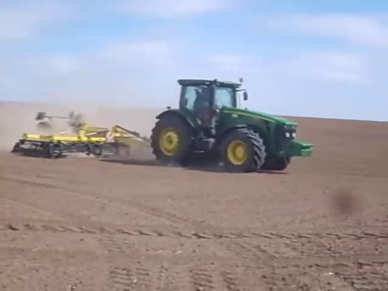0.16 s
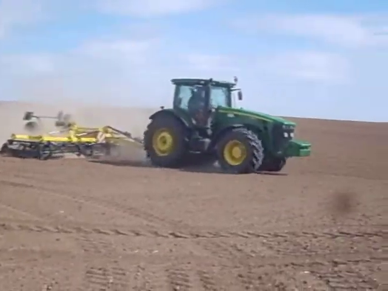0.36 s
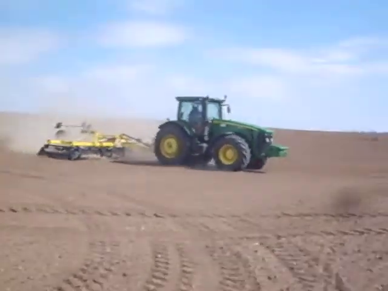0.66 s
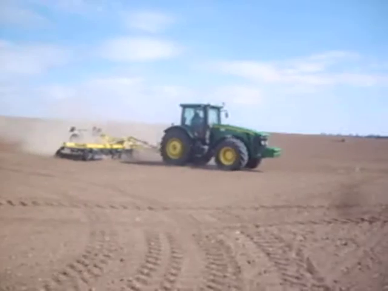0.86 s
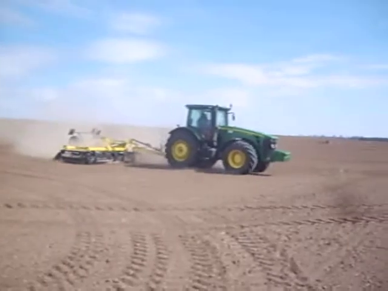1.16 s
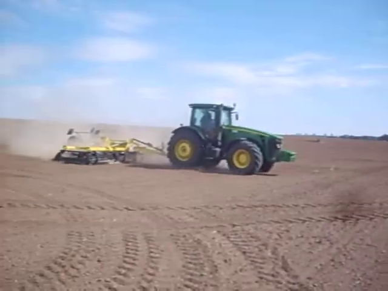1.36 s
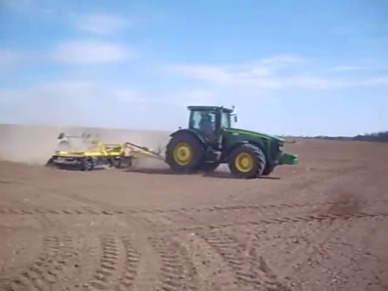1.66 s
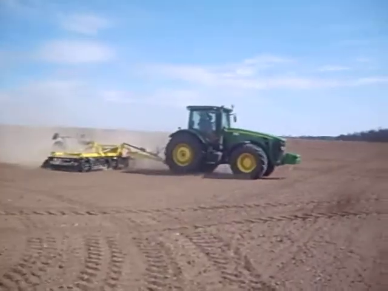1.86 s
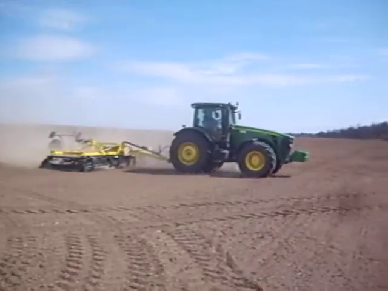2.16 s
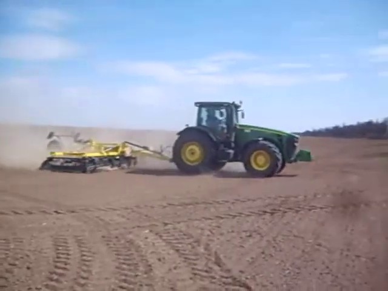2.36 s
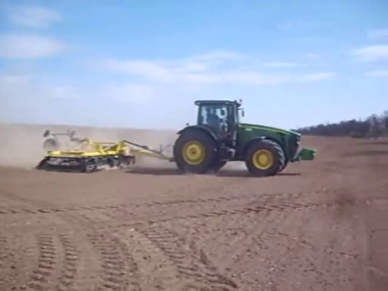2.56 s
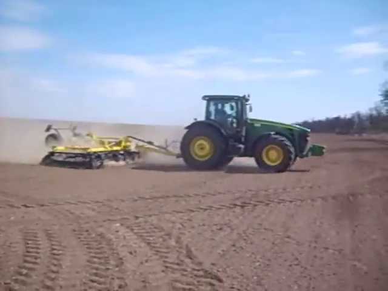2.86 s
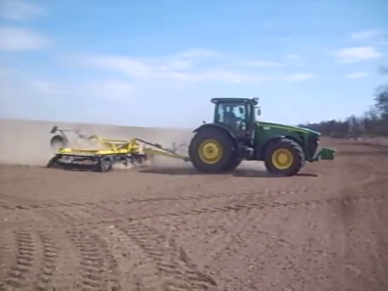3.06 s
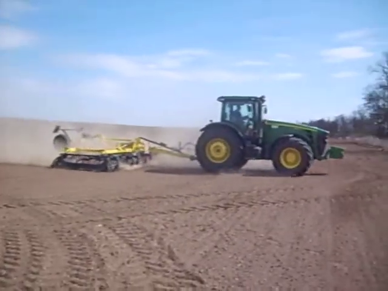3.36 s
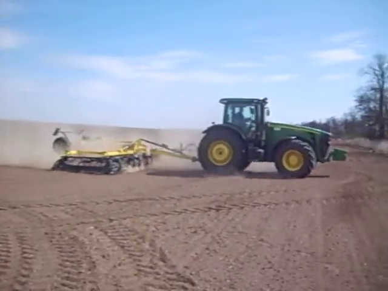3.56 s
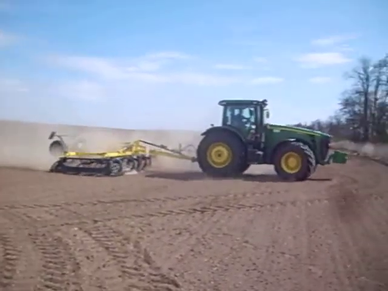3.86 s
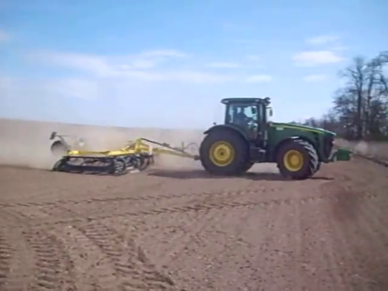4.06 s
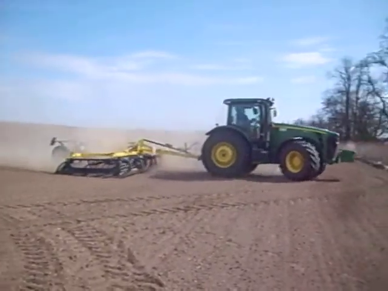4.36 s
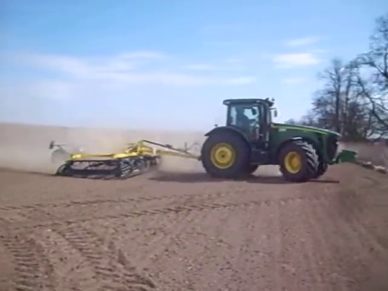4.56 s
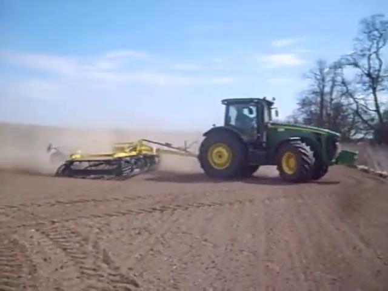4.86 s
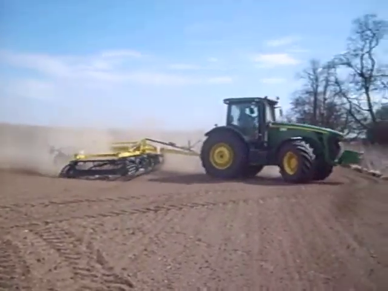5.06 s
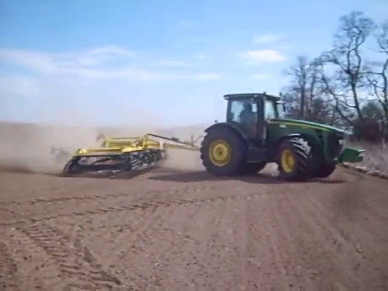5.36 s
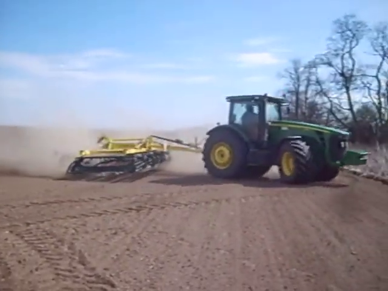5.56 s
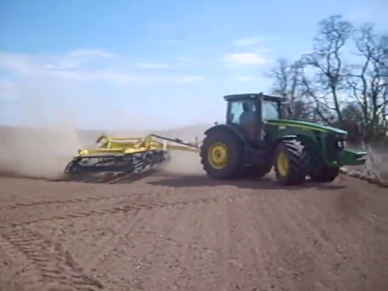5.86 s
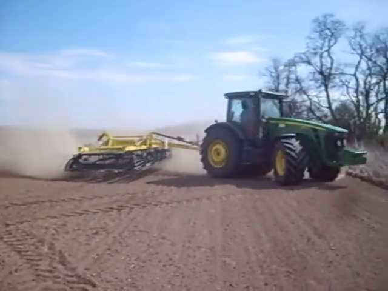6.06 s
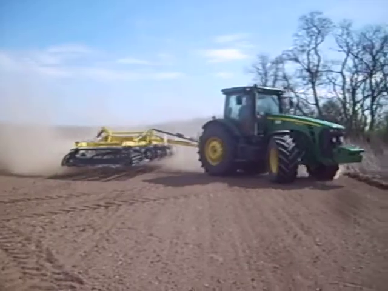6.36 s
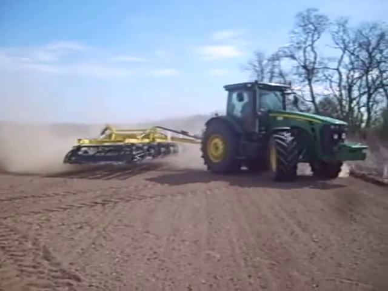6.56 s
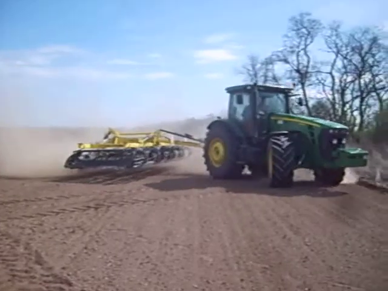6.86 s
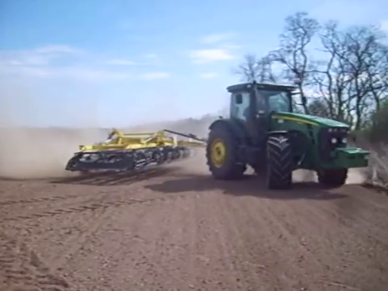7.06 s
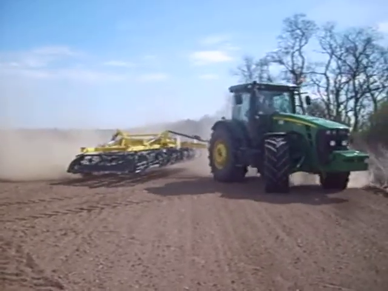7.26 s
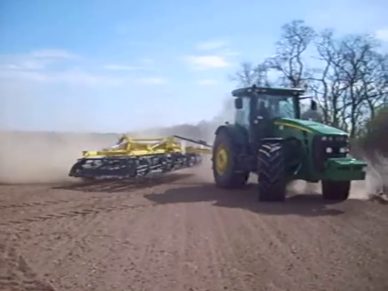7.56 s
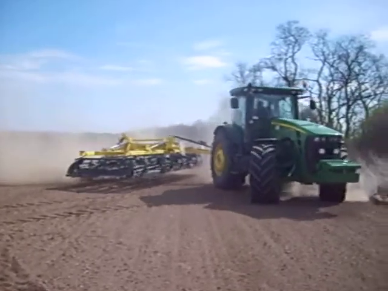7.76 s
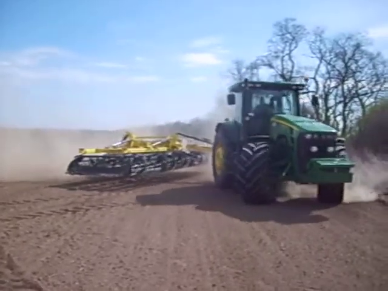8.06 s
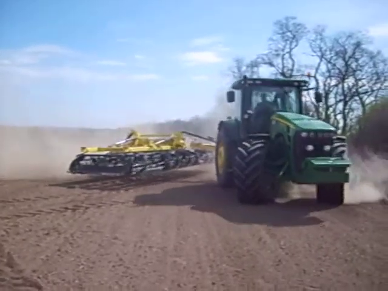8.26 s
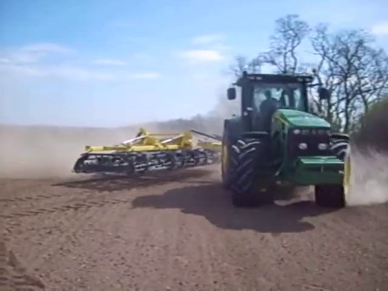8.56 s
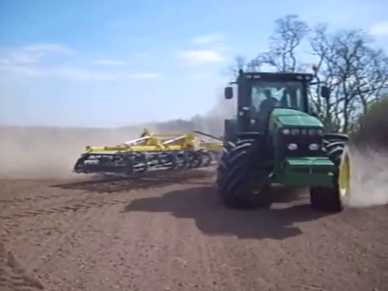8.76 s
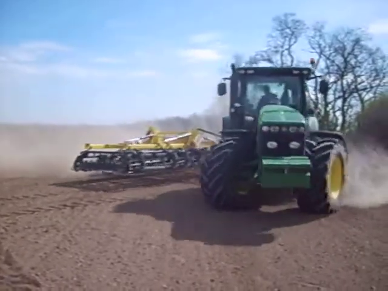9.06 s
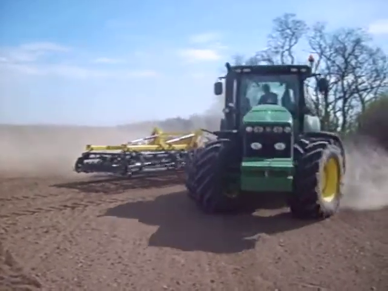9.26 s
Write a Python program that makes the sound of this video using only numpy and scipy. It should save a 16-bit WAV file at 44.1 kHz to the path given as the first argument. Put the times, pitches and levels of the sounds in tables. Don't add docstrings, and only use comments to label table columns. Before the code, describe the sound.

A big diesel tractor roars and drones across an open field, throttles down, then turns and comes close, with faint squeals, wind rumble and dropouts.

```python
import sys
import numpy as np
from scipy import signal
from scipy.fft import rfft, irfft, next_fast_len
from scipy.io import wavfile

SR = 44100
rng = np.random.default_rng(int(sys.argv[2]) if len(sys.argv) > 2 else 0)


def bounce(signal):
    frames = np.transpose(np.atleast_2d(signal))
    limited = np.clip(frames, -1, 1)
    pcm = np.round(limited * 32767).astype(np.int16)
    wavfile.write(sys.argv[1], SR, pcm)


def how_loud(loudness_db):
    steps = np.asarray(loudness_db, float) / 20
    return 10 ** steps


N = 414099

# start_s, firing_hz, level_db
FIRING = [(0, 108.2, -66), (2.1, 109.4, -52.5), (2.65, 93.8, -63), (3.38, 68.6, -47), (3.86, 73.7, -51),
          (4.04, 64.6, -42), (4.35, 65.2, -38), (5.2, 70.6, -40.5), (5.36, 73.8, -44.5), (5.65, 73.17, -50),
          (6.1, 69.1, -43), (6.8, 70, -44), (7.07, 72.8, -42), (7.27, 75.65, -62), (7.6, 70, -48),
          (8.15, 68.4, -43), (8.9, 77.45, -42.5), (9.39, 75.4, -47)]


def firing():
    return in_time(FIRING)


# pitch_hz, level_db
PIPE_RESPONSE = [(36, -83), (45, -58.5), (54, -59.5), (135, -61.5), (175, -45.5), (217, -42.5),
                 (240, -41.5), (330, -45)]
# start_s, end_s, change_db
FIRING_SWELLS = [(2.9, 3.5, -12)]
SECOND_SWELLS = [
    (4.0, 5.0, 2),
    (6.9, 7.35, 7),
    (8.95, 9.15, 19),
]
HALF_SWELLS = [(2.3, 3.15, 8)]
THIRD_SWELLS = [(2.3, 2.7, 8), (3.3, 4.0, -6), (4.08, 4.55, 14), (7.1, 7.4, 10), (8.8, 9.5, 11)]
THREE_AND_HALF_SWELLS = [(4.0, 5.45, 21), (8.3, 9.3, 22)]


def exhaust(firing_hz, firing_db):
    second_db = at_hz(PIPE_RESPONSE, 2 * firing_hz)
    half_db = at_hz(PIPE_RESPONSE, 0.5 * firing_hz)
    third_db = at_hz(PIPE_RESPONSE, 3 * firing_hz) - 18.5
    levels_db = {
        1: swelling(firing_db, FIRING_SWELLS),
        2: swelling(second_db, SECOND_SWELLS),
        0.5: swelling(half_db, HALF_SWELLS),
        3: swelling(third_db, THIRD_SWELLS),
        3.5: swelling(-72, THREE_AND_HALF_SWELLS),
    }
    return sum(tone(order * firing_hz, db, 0.2 * order, 0.35) for order, db in levels_db.items())


# pitch_hz, level_db per Hz
PANEL_SPECTRUM = [(40, -34.5), (85, -21), (120, -5), (190, 0.5), (260, -1.5), (330, -4.5), (420, -13.5),
                  (520, -36.5)]


def panels(near_db):
    return how_loud(-46 + 1.3 * near_db) * coloured(PANEL_SPECTRUM, 0.76)


# pitch_hz, level_db per Hz
BLOCK_SPECTRUM = [(240, -36), (400, -14.5), (457, -9.5), (559, -3.5), (606, -0.5), (893, 1), (1060, -5.5),
                  (1460, 0), (1690, -2.5), (1940, -7), (2320, -3.5), (2670, -19), (2890, -13.5),
                  (3160, -24.5), (3300, -15.5), (4290, -45), (7260, -120)]


def block(near_db, octaves, beat):
    level_db = -35 + near_db + 6.5 * octaves
    return how_loud(level_db + 0.19 * beat) * coloured(BLOCK_SPECTRUM, 1.0, count=8)


# pitch_hz, level_db per Hz
INTAKE_SPECTRUM = [(1820, -43.5), (3100, -8), (3210, -18.5), (3570, -3), (4250, 0.5), (5180, -0.5),
                   (5550, -2.5), (5990, -2.5), (6400, -12.5), (8320, -42), (14100, -120)]
TOP_SPECTRUM = [(3590, -33.5), (6100, -11), (6320, 1), (7140, 3), (8400, -0.5), (9350, -6), (10800, -20),
                (11500, -25), (12200, -42), (15900, -70.5), (22000, -120)]


def air_hiss(intake_db, octaves, beat):
    flow_change_db = intake_db - intake_db.mean()
    top_db = -48.5 + 0.64 * flow_change_db + 3 * octaves
    intake = how_loud(intake_db) * coloured(INTAKE_SPECTRUM, 1.0)
    top = how_loud(top_db) * coloured(TOP_SPECTRUM, 1.0)
    return how_loud(1.2 * beat) * (intake + top)


# start_s, nearness_gain_db, intake_flow_db
APPROACH = [(0, 0.9, -37.5), (1.2, 0.6, -40), (2.3, 1.4, -38.5), (2.7, -0.7, -42.5), (3.1, -0.5, -44.5),
            (4.0, -0.3, -43), (4.3, 0.7, -39), (5.0, 1.5, -36.5), (5.33, 3.5, -37.5), (5.7, 3.5, -39.5),
            (6.3, 5, -39), (6.8, 5, -36), (7.15, 5.5, -36), (7.7, 5.5, -39.5), (8.2, 7.5, -34),
            (8.6, 7.5, -33), (9.0, 7.5, -32.5), (9.39, 8, -35)]


def roar(firing_hz):
    near_db, intake_db = in_time(APPROACH)
    octaves = np.log2(firing_hz / 70)
    beat = np.cos(2 * np.pi * np.cumsum(firing_hz) / SR)
    load = how_loud(0.5 * drift(41))
    engine = block(near_db, octaves, beat) + air_hiss(intake_db, octaves, beat)
    return panels(near_db) + load * shadowed(engine)


# start_s, end_s
TURN = (1.9, 6.6)
# pitch_hz, width_hz, share lost side-on, share lost head-on
ECHO_BANDS = [(2260, 1130, .01, 0.41), (5600, 1000, .01, 0.55), (6190, 500, .05, 0.61),
              (7300, 1200, 0.5, .01)]


def shadowed(x):
    turned = np.interp(np.arange(N) / SR, TURN, [0, 1])
    for hz, width_hz, side_on, head_on in ECHO_BANDS:
        share = np.clip(side_on + (head_on - side_on) * turned, 0, 1)
        band = signal.lfilter(*signal.iirpeak(hz, hz / width_hz, fs=SR), x)
        x = x - share * band
    return x


# start_s, blade_pass_hz, level_db
FAN = [(0, 164, -33), (2.22, 164, -33.5), (2.45, 149, -41), (2.7, 141, -44.5), (3.42, 106, -51),
       (3.85, 124.8, -48), (4.05, 119.5, -54), (4.5, 130, -45.5), (5.0, 146, -41), (5.62, 171.5, -30),
       (6.1, 160.5, -31.5), (6.45, 166, -30.5), (6.9, 164.5, -31), (7.25, 174, -34), (7.6, 161, -32),
       (7.95, 156.5, -33.5), (8.65, 167, -30.5), (9.39, 166.5, -30)]
# start_s, end_s, change_db
FAN_SWELLS = [(0.275, 0.499, -4), (1.347, 1.55, -5), (1.733, 1.946, -9), (7.95, 8.5, -3)]
FAN_OCTAVE_SWELLS = [(-.2, 1.3, -5), (3.95, 4.35, -12), (4.7, 6.9, 9), (7.05, 7.5, 10), (8.7, 8.95, 11)]


def fan():
    hz, level_db = in_time(FAN)
    drone = tone(hz, swelling(level_db, FAN_SWELLS), 0.53, 0.22)
    return drone + tone(2 * hz, swelling(-57, FAN_OCTAVE_SWELLS), 1.5, 1.8)


# level_db, level_db
PUMP = (-57, -58)
# start_s, end_s, change_db
PUMP_LOW_SWELLS = [(5.45, 6.05, 14), (6.2, 7.45, 13)]
PUMP_HIGH_SWELLS = [(-.2, 3.2, -6), (3.3, 3.7, 14), (3.8, 5.4, -10), (5.55, 6.25, 16), (6.8, 7.5, 18)]
PUMP_TOP_SWELLS = [(6.3, 7.05, 28)]


def pump(firing_hz):
    low_db, high_db = swelling(PUMP[0], PUMP_LOW_SWELLS), swelling(PUMP[1], PUMP_HIGH_SWELLS)
    low, high = tone(firing_hz * 8, low_db, 2, 3.0), tone(firing_hz * 12, high_db, 3, 3.5)
    return low + high + tone(firing_hz * 18, swelling(-72, PUMP_TOP_SWELLS), 4, 3.0)


# teeth per firing, level_db between swells
ACCESSORY = (8.1, -75)
TRANSMISSION = (33.5, -75)
# start_s, end_s, change_db
ACCESSORY_SWELLS = [
    (2.1, 3.33, 28),
    (2.15, 2.6, 7),
]
TRANSMISSION_SWELLS = [(3.2, 6.38, 22), (3.92, 5.8, 5), (3.92, 4.5, 7), (5.12, 5.5, 6), (5.78, 6.38, 7),
                       (6.0, 6.38, 4)]


def gears(firing_hz):
    teeth, level_db = ACCESSORY
    accessory = tone(firing_hz * teeth, swelling(level_db, ACCESSORY_SWELLS), 10, 3.0)
    teeth, level_db = TRANSMISSION
    return accessory + tone(firing_hz * teeth, swelling(level_db, TRANSMISSION_SWELLS), 3, 2.0)


# start_s, pitch_hz
TURBO = [(0, 11020), (2.15, 10930), (2.4, 10430), (2.85, 9070), (3.15, 8040), (3.4, 7480), (3.8, 7300),
         (4.85, 7980), (5.3, 8290), (5.65, 8310), (6.2, 7730), (6.65, 7770), (7.1, 7970), (7.3, 7660),
         (7.9, 6950), (8.45, 6880), (8.85, 7740), (9.39, 7680)]
# pitch_hz, level_db
TURBO_RESPONSE = [(6900, -61), (7500, -61), (8000, -57), (8300, -57), (9100, -62), (10400, -66),
                  (11000, -75.5)]
# start_s, end_s, change_db
TURBO_SWELLS = [(3.2, 4.75, -7), (4.7, 5.4, 2), (5.9, 6.5, -2), (6.4, 7.35, 4), (7.3, 9.6, 4)]


def turbo():
    hz, = in_time(TURBO)
    turbulence_db = 3 * drift(60)
    level_db = swelling(at_hz(TURBO_RESPONSE, hz), TURBO_SWELLS) - 5 + turbulence_db
    image_db = level_db - 1 - (SR / 4 - hz) * 0.02
    return tone(hz, level_db, 22, 2.0) + tone(SR / 2 - hz, image_db, 14, 2.5)


# start_s, end_s, pitch_hz, width_hz, level_db
SQUEALS = [(-0.5, 0.51, 5750, 80, -52.5), (-0.5, .42, 5050, 150, -45.5), (1.2, 2.4, 5100, 400, -46.5),
           (4.17, 4.28, 1550, 30, -44), (4, 5.2, 5450, 330, -54), (2.7, 3.8, 7300, 90, -64),
           (1.5, 2.2, 11020, 200, -73.5), (8.5, 9.2, 5150, 350, -46), (8.3, 9.39, 6000, 300, -53),
           (8.5, 9.2, 266, 14, -45.5), (9.1, 9.5, 600, 150, -39), (7.65, 7.95, 600, 120, -43),
           (6.45, 7.4, 1550, 450, -39)]


def squeals():
    out, t = np.zeros(N), np.arange(N) / SR
    for start, end, hz, width_hz, db in SQUEALS:
        swell = np.clip(np.minimum(t - start + 0.051, end - t + 0.05) / 0.09, 0, 1)
        out += how_loud(db + 3.6 * drift(14)) * swell * narrow(N, hz, width_hz)
    return out


# start_s, length_s, pitch_hz, width_hz, level_db
CHINKS = [(2.517, .012, 6330, 700, -40.5), (2.615, .04, 7300, 150, -51), (2.649, .018, 7100, 200, -45.5),
          (2.792, .014, 4470, 500, -40), (2.8, .012, 6000, 700, -44.5), (2.822, 0.01, 5900, 800, -38),
          (2.831, .016, 6260, 500, -43), (2.841, 0.039, 9320, 80, -45.5), (2.872, 0.016, 9400, 120, -54),
          (2.965, .03, 8250, 150, -57), (3.0, 0.023, 9300, 120, -57), (3.33, .02, 6300, 400, -47.5),
          (6.29, .014, 5940, 600, -41), (8.483, .03, 10430, 400.3, -56), (8.49, .025, 11500, 400.5, -68)]


def chinks():
    out, size = np.zeros(N), 3000
    for s, length_s, hz, width_hz, db in CHINKS:
        share = np.clip(np.arange(size) / SR / length_s, 0, 1)
        burst = np.sin(np.pi * share ** 0.89) * narrow(size, hz, width_hz)
        first = round(s * SR)
        out[first:first + size] += how_loud(db + 0.5) * burst
    return out


# start_s, level_db, pitch_hz
PUFFS = [
    (4.3, -33, 50),
    (8.02, -21, 80),
    (8.315, -32, 45),
    (8.44, -19, 80),
]


def puffs():
    out, t = np.zeros(N), np.arange(N) / SR
    for s, db, hz in PUFFS:
        after = np.clip(t - s, 0, None)
        decay = after / 0.016 * np.exp(1 - after / 0.0065)
        out += how_loud(db) * np.sin(2 * np.pi * hz * after) * decay
    return out


# start_s, end_s, change_db
RUMBLE_SWELLS = [(2.35, 3.15, 4), (4.15, 4.5, 8), (5.2, 6.0, -4), (7.95, 8.45, 5), (9.0, 9.6, 4)]


def wind():
    spectrum = [(12, -14), (30, -10.5), (50, -10.5), (90, -5.0), (160, -44)]  # pitch_hz, level_db per Hz
    return how_loud(swelling(-54.5, RUMBLE_SWELLS)) * coloured(spectrum, 2.5, count=3)


# start_s, peak_db
STRONG_TICKS = [(0.3545, -33), (0.373, -44.5), (1.94, -39.5), (1.956, -40.5), (2.14, -36.5), (2.3745, -36),
                (2.4756, -37.5), (2.6742, -36), (3.6068, -37), (4.3729, -38.5), (4.4065, -42.5),
                (5.173, -38.5), (5.7402, -39), (6.0068, -40.5), (6.274, -35.5), (6.54, -38.5),
                (6.974, -39.5), (7.5418, -40.5), (7.8064, -35.5), (8.107, -43), (8.1394, -34),
                (8.3401, -34), (8.373, -35.5), (8.908, -34), (8.9407, -40), (9.1387, -41.5), (9.207, -33),
                (9.34, -35)]


def ticks():
    clicks = np.zeros(N)
    joins_per_s, first_join_s, delay = 30, 0.0068, 45
    joins = np.arange(first_join_s, N / SR - 0.01, 1 / joins_per_s)
    clicks[np.round(joins * SR).astype(int) + delay] = how_loud(-31) * rng.laplace(size=len(joins))
    s, db = np.transpose(STRONG_TICKS)
    strong = how_loud(-17.5 + 1.4 * (db + 40)) * rng.choice([-1, 1], len(s))
    clicks[np.round(s * SR).astype(int) + delay] = strong
    clicks = signal.sosfilt(signal.butter(1, 2500, "high", fs=SR, output="sos"), clicks)
    return signal.sosfilt(signal.butter(6, 9300, fs=SR, output="sos"), clicks)


def in_time(rows):
    s, *columns = np.vstack(rows).T
    return [np.interp(np.arange(N) / SR, s, c) for c in columns]


def at_hz(points, hz):
    point_hz, level_db = np.transpose(points)
    return np.interp(np.log(hz), np.log(point_hz), level_db)


def swelling(db, swells):
    t = np.arange(0, N / SR, 0.005)
    change = np.zeros(len(t))
    for start, end, change_db in swells:
        ramp = np.minimum(t - start, end - t) / 0.078
        change += change_db * np.clip(ramp, 0, 1)
    return db + np.interp(np.arange(N) / SR, t, change)


def rms_one(x):
    return x / np.sqrt(np.mean(x ** 2) + 1e-20)


def drift(rate_hz):
    r = np.exp(-2 * np.pi * rate_hz * 40 / SR)
    noise = rng.standard_normal(N // 40 + 2002)
    slow = signal.lfilter([1], [1, -2 * r, r * r], noise)[2000:]
    return np.interp(np.arange(N) / 40, np.arange(len(slow)), rms_one(slow))


def tone(hz, db, wobble_hz, flicker_db):
    phase = 2 * np.pi * np.cumsum(hz + wobble_hz * drift(6)) / SR + rng.uniform(0, 2 * np.pi)
    return np.sqrt(2) * how_loud(db + flicker_db * drift(12)) * np.sin(phase)


def coloured(points, patchy_db, count=6):
    size = next_fast_len(N)
    log_hz = np.log(np.arange(1, size // 2 + 2) * SR / size)
    hz, db = np.transpose(points)
    response = how_loud(np.interp(log_hz, np.log(hz), db, left=-120, right=-120))
    shaped = rfft(rng.standard_normal(size)) * response
    centres = np.linspace(np.log(hz[0]), np.log(hz[-1]), count)
    out = np.zeros(N)
    for share in np.eye(count):
        gain = how_loud(patchy_db * (drift(1) + 0.25 * drift(54)))
        band = shaped * np.interp(log_hz, centres, share)
        out += gain * irfft(band, size)[:N]
    return rms_one(out)


def ring(x, hz, t60):
    r, w = how_loud(-60 / (t60 * SR)), 2 * np.pi * hz / SR
    return signal.lfilter([0, np.sin(w)], [1, -2 * r * np.cos(w), r * r], x + 1e-18)


def narrow(size, hz, width_hz):
    t60 = np.log(1000) / np.pi / width_hz
    noise = rng.standard_normal(size + 2000)
    return rms_one(ring(ring(noise, hz, t60), hz, t60)[2000:])


def scene():
    firing_hz, firing_db = firing()
    tractor = exhaust(firing_hz, firing_db) + roar(firing_hz) + fan()
    tractor += pump(firing_hz) + gears(firing_hz) + turbo()
    events = squeals() + chinks() + puffs()
    return (tractor + events + wind())[None]


def band_limit(x):
    return signal.sosfilt(signal.butter(12, 12360, fs=SR, output="sos"), x)


# start_s, end_s
DROPOUTS = [
    (.4222, 1.1883),
    (4.6414, 4.7415),
    (5.3448, 5.4413),
]


def record(dry):
    live = np.ones(N)
    for start, end in DROPOUTS:
        live[round(start * SR):round(end * SR)] = 0
    top_cut = signal.butter(12, 11700, fs=SR, output="sos")
    mix = signal.sosfilt(top_cut, (dry + ticks()) * live)
    return band_limit(mix)


dry = scene()
out = record(dry)
bounce(out)
```